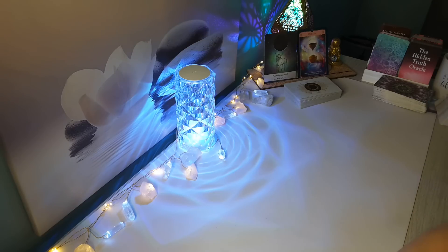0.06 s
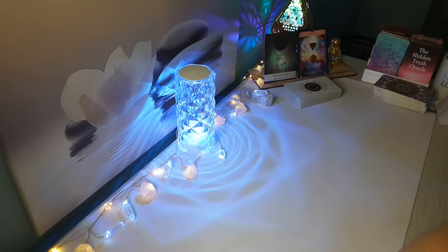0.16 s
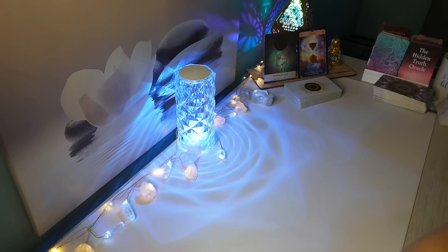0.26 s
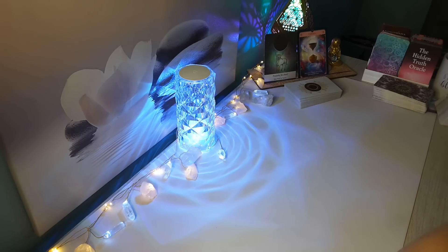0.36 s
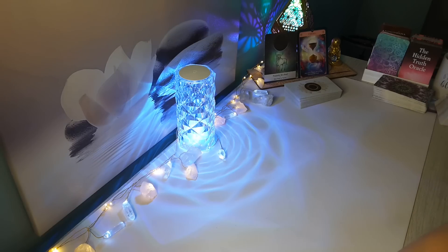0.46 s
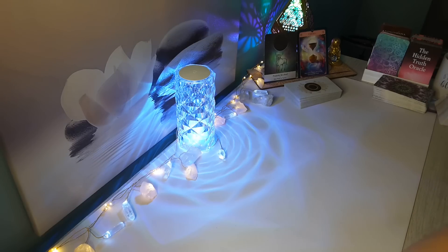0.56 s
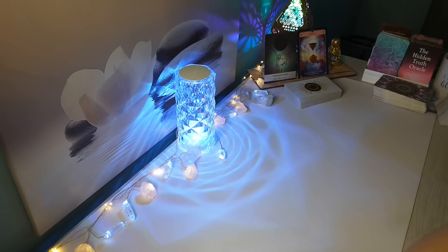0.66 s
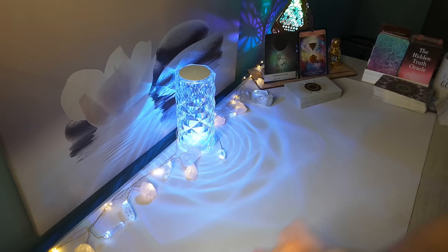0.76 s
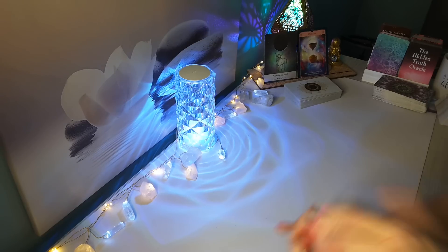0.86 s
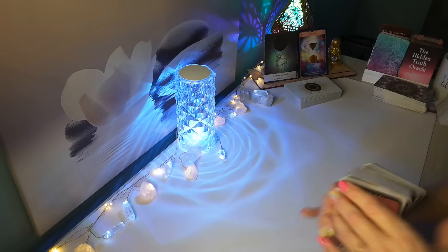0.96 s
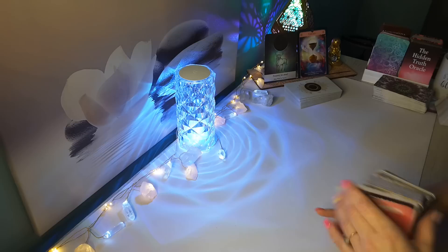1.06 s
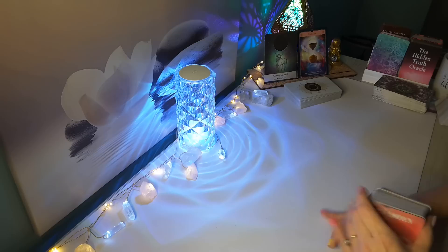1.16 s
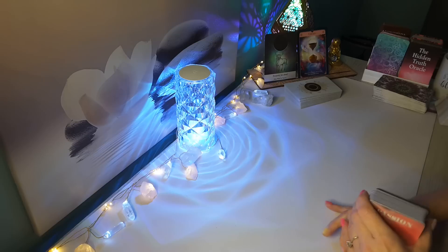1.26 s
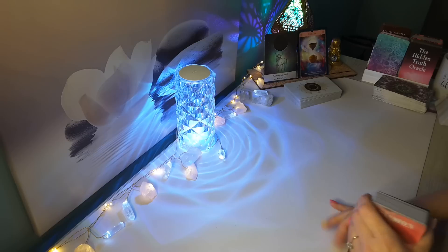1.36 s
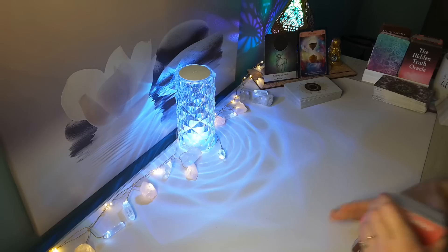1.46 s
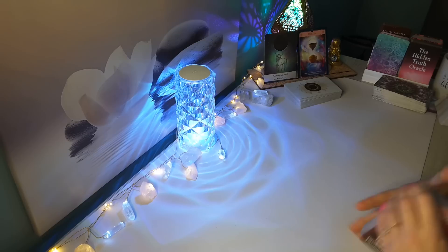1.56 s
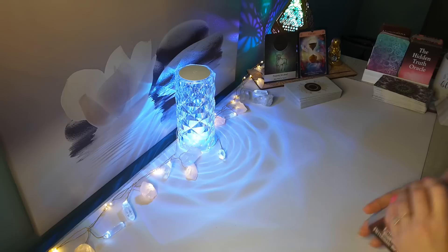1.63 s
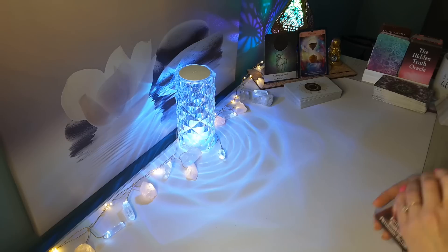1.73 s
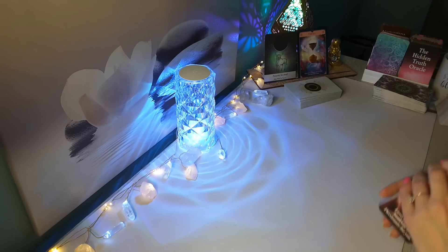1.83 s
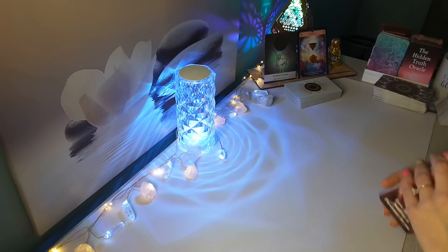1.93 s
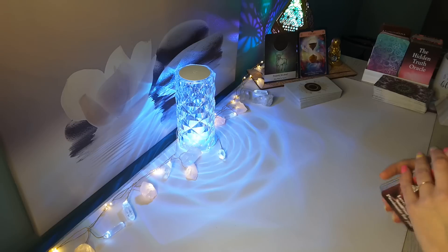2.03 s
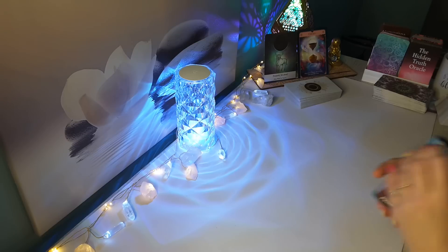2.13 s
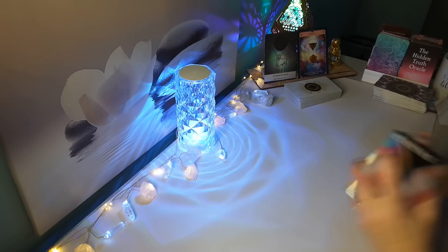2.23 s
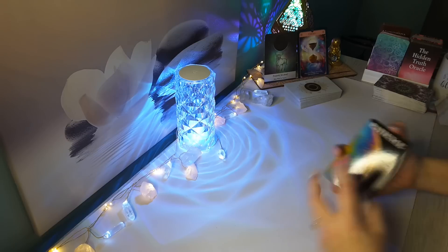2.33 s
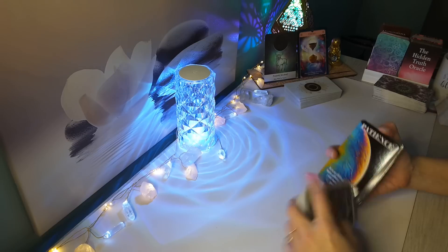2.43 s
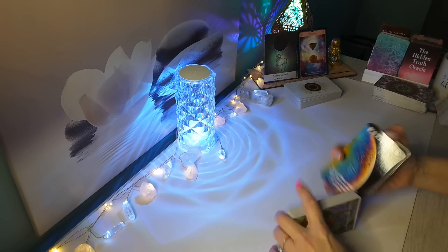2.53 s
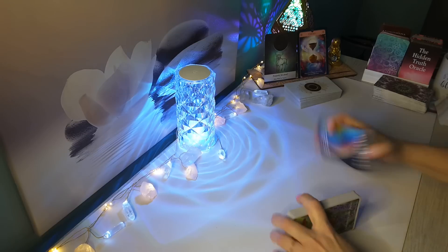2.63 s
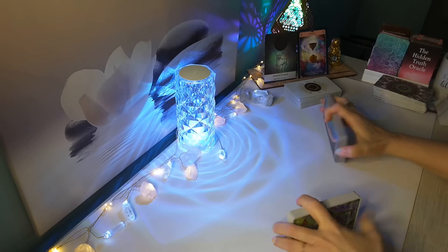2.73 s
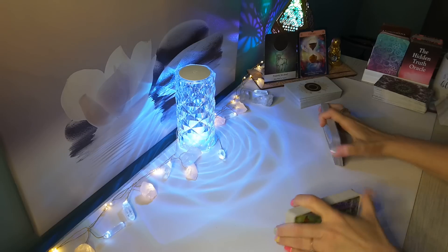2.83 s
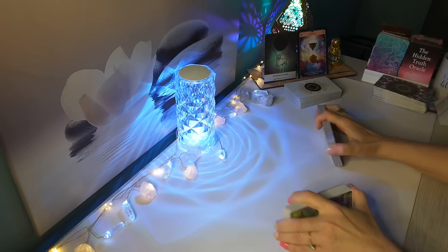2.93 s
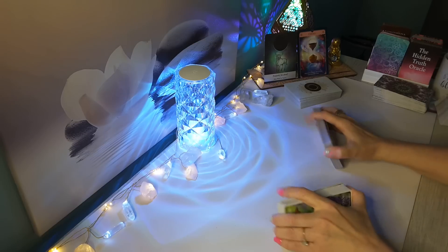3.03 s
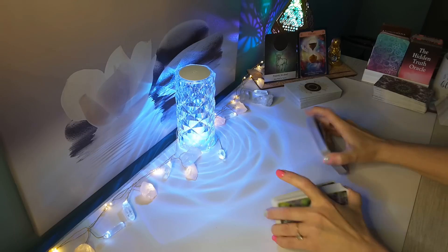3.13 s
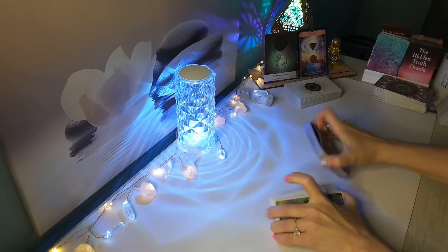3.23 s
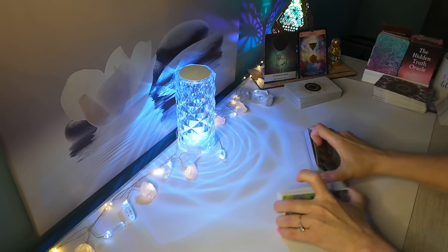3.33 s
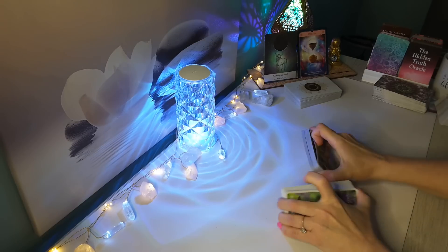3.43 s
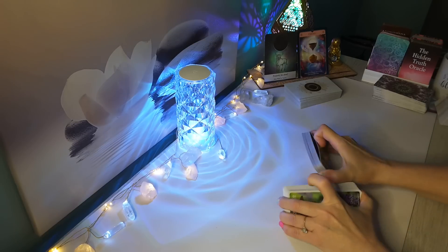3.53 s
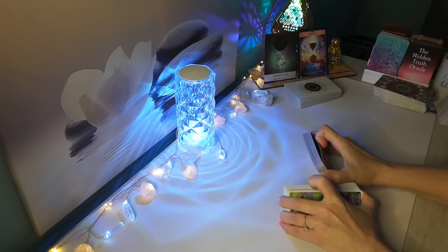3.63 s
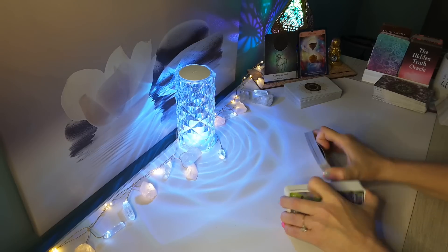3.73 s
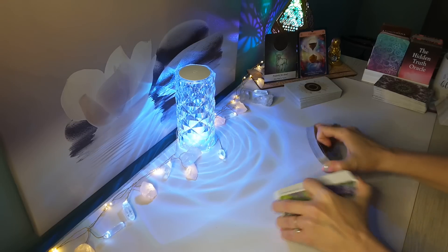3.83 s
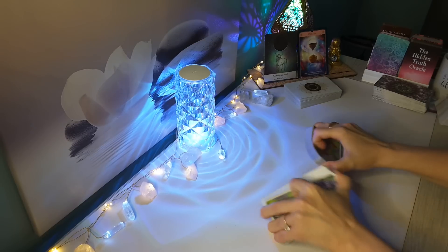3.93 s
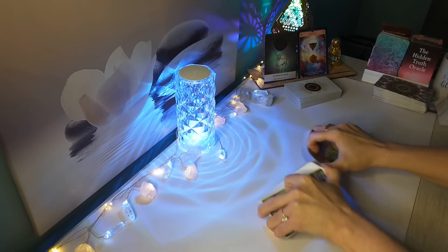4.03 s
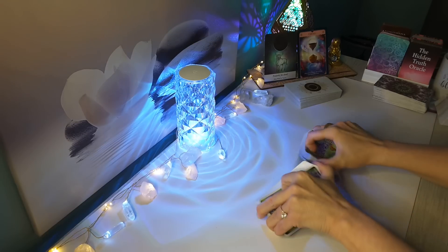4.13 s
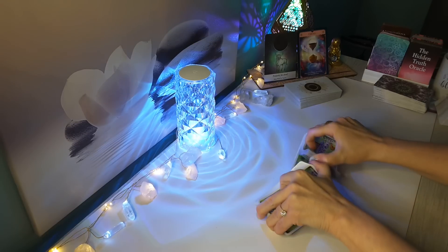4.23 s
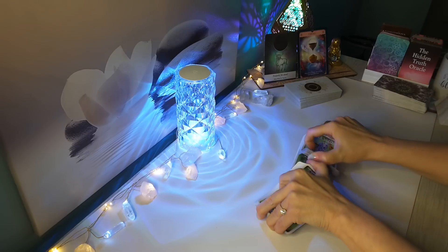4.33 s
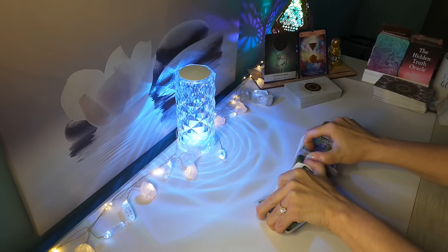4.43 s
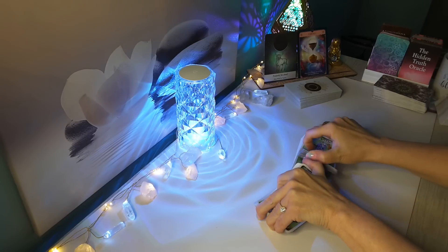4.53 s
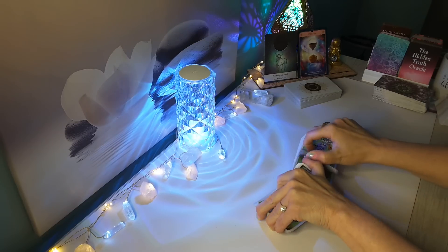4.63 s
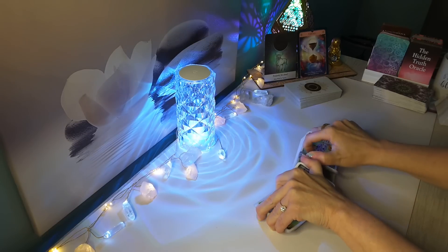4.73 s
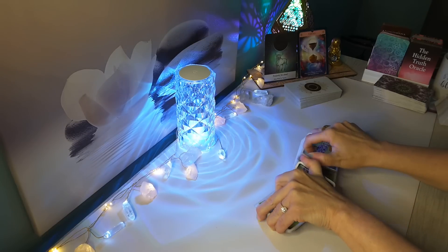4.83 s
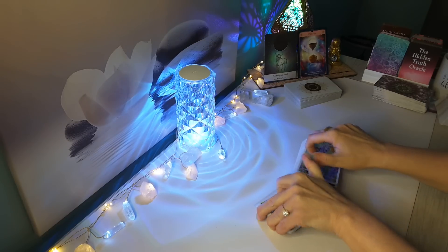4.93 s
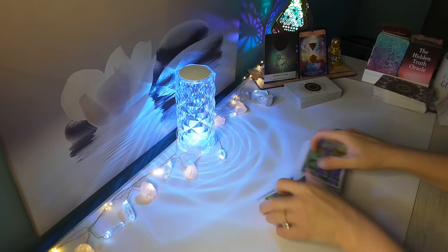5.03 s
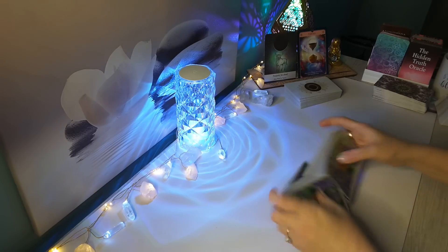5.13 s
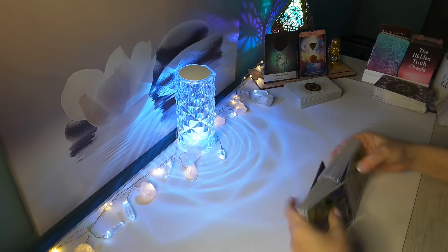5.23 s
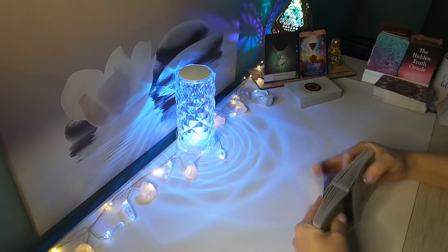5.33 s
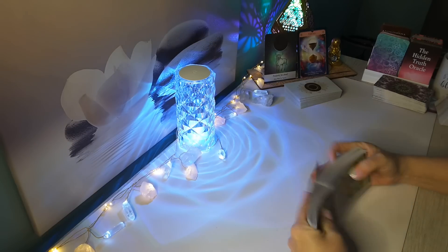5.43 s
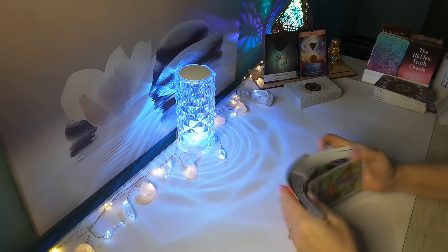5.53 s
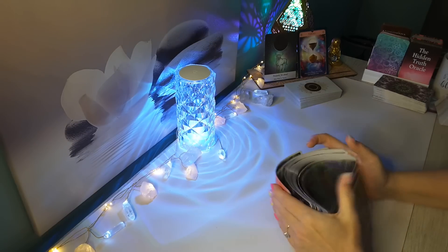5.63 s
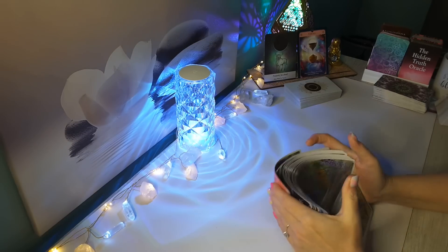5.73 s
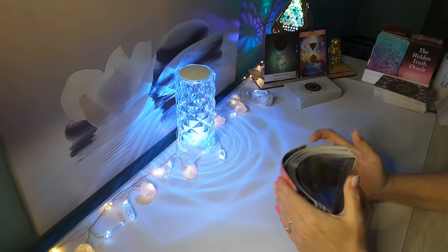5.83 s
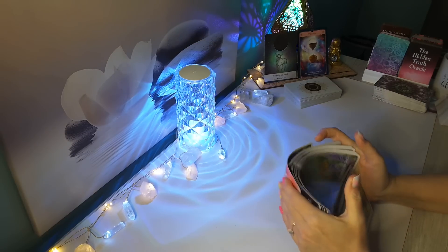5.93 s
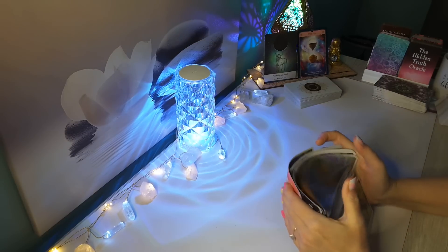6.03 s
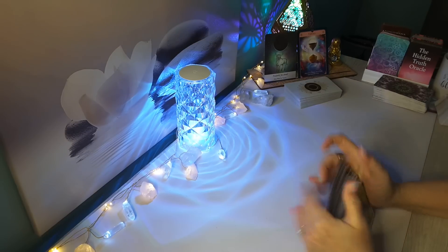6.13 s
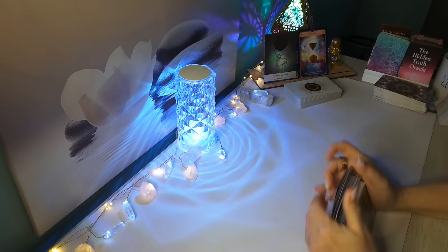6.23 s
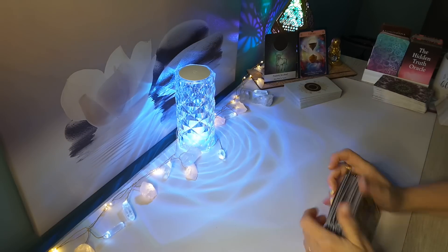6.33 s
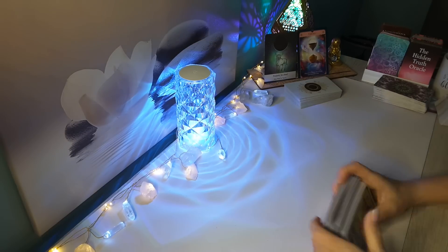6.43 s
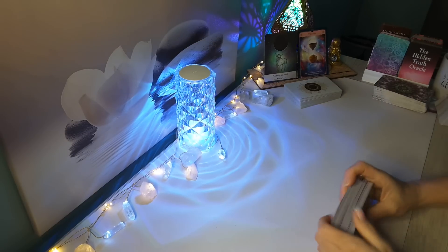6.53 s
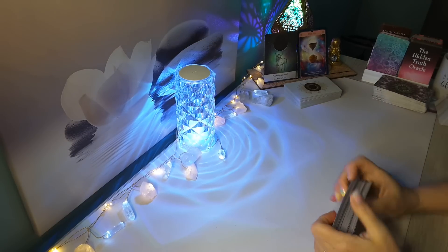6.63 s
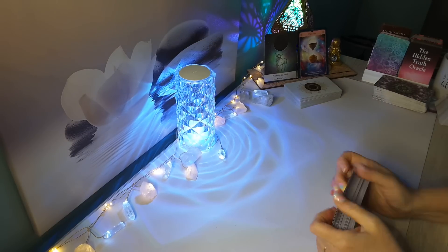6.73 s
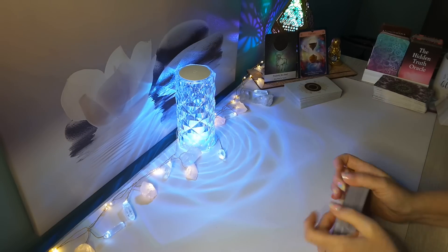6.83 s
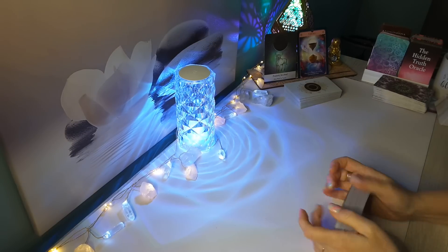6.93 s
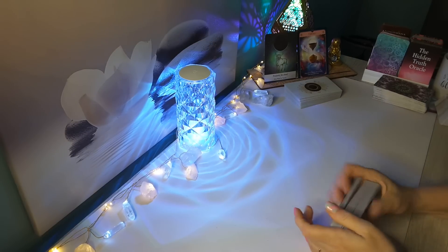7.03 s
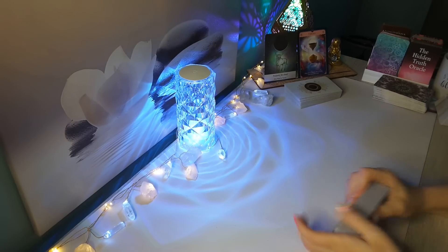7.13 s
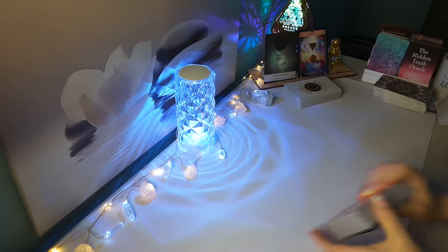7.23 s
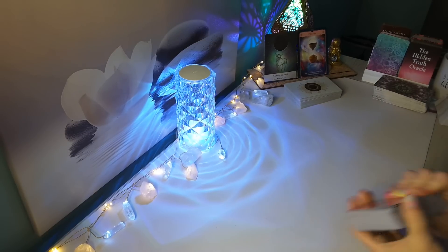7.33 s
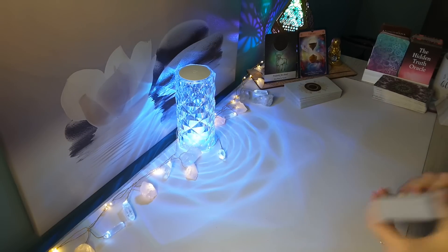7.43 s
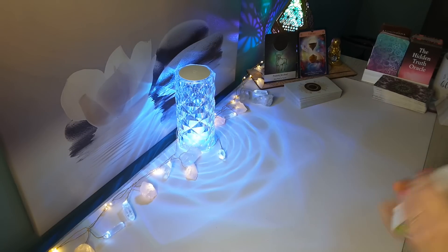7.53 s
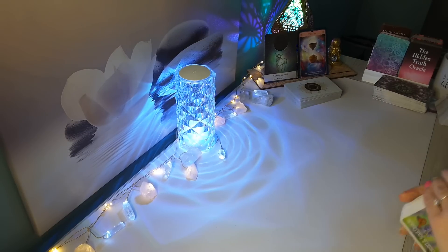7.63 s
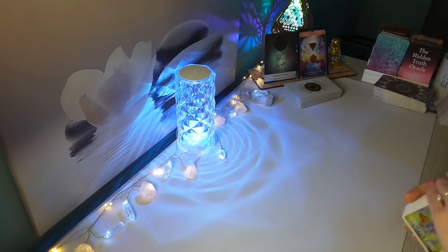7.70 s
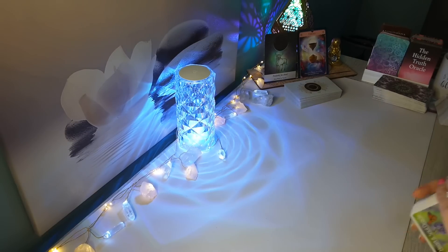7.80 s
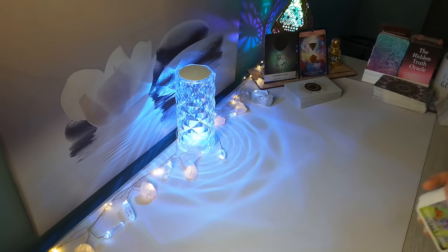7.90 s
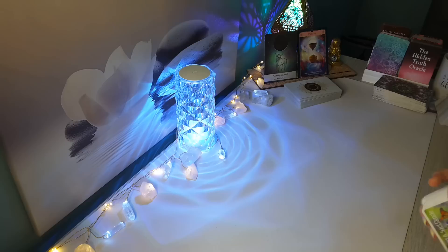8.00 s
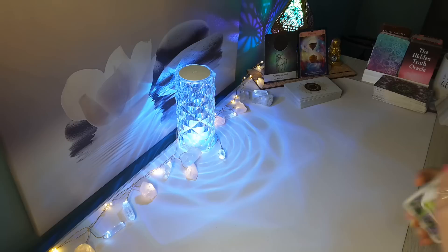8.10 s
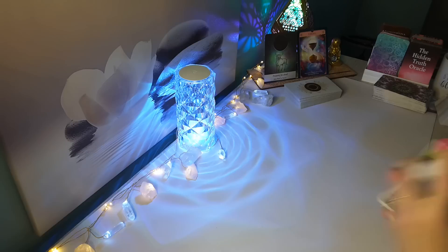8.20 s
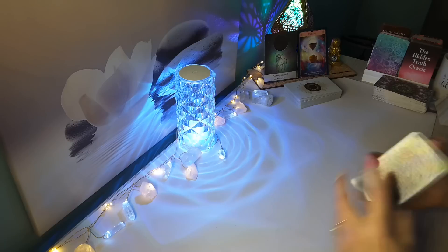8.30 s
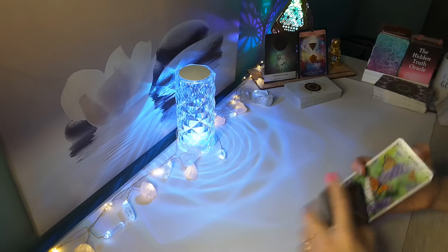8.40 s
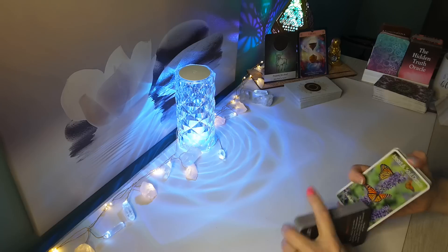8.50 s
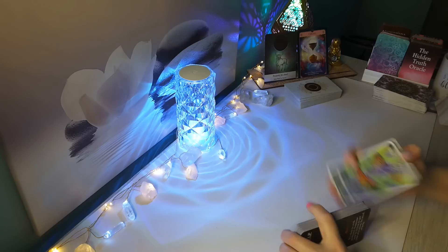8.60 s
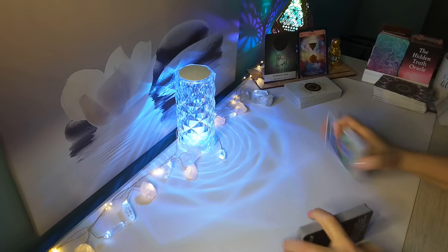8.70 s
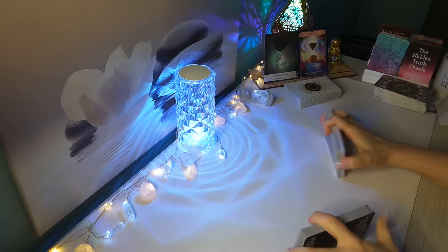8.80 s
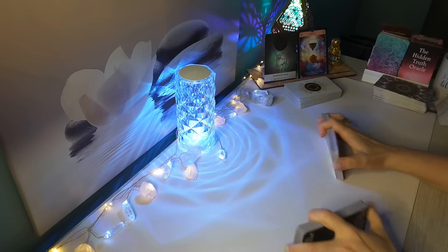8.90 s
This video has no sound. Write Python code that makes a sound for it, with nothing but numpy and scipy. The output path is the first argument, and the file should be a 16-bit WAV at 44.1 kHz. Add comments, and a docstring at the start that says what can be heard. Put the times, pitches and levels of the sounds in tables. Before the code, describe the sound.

Playing cards handled close up on a table in a small, lively room. Faint rubs and light knocks come first, with a couple of flicks, then a near pause. A sharp riffle crackles and rushes to its end, a bridge flutters down in a hiss with loud snaps, and taps square the deck. After near quiet, another soft cut. The stereo microphone is bright, its treble ringing slightly toward the left, over very faint hiss and rumble.

```python
"""A deck of cards on a table in a small room, nearby walls: filtered noise bursts, grains and resonances.
First the cards rub in the hands, packets are nudged and cut with knocks, and a few cards snap off the thumbs.
At 4.5 s the riffle rushes to its end; from 5.65 s the bridge cascades with a fluttering hiss.
After 6.3 s the deck is squared with a few taps, and near 8.5 s it is cut again.
The table rings and the room answers throughout, over faint hiss and rumble; the microphone rings near 8 kHz."""
import sys
import numpy as np
from scipy import signal
from scipy.fft import rfft, irfft, next_fast_len
from scipy.io import wavfile

SR = 44100
rng = np.random.default_rng(int(sys.argv[2]) if len(sys.argv) > 2 else 0)


def generate_wav(signal):
    """Clip the signal to [-1, 1] and save it as 16-bit WAV at the path in sys.argv[1]."""
    frames = np.transpose(np.atleast_2d(signal))
    scaled = np.clip(frames, -1, 1) * 32767
    pcm = np.round(scaled).astype(np.int16)
    wavfile.write(sys.argv[1], SR, pcm)


N = 395136  # samples

# Event levels below are relative; each function adds its layer's level.
# Packets nudged and squared on the table: start_s, end_s, edge_friction_db, table_patter_db
NUDGE_EVENTS = [(0.0, 0.064, -58, -56.5), (3.095, 3.177, -62, -60.5), (3.287, 3.584, -66, -66.5),
                (4.21, 4.43, -47.5, -49.5), (5.242, 5.403, -59, -58.5), (5.53, 5.718, -51.5, -55.5),
                (6.33, 6.85, -55.5, -55), (6.9, 7.22, -58.5, -64)]
# Strokes of card over card: middle_s, friction_db, half_length_s
SLIDE_STROKES = [(0.052, -53.5, 0.0073), (0.19, -67.5, 0.027), (0.486, -55, 0.011), (0.643, -57.5, 0.058),
                 (0.89, -50.5, 0.009), (1.2, -58, 0.059), (1.352, -52, 0.034), (1.482, -55.5, 0.019),
                 (2.138, -57.5, 0.015), (2.297, -57, 0.0076), (2.389, -52, 0.035), (3.146, -58.5, 0.015),
                 (4.256, -35, 0.018), (5.147, -57.5, 0.058), (5.391, -41.5, 0.033), (5.559, -42.5, 0.024),
                 (7.33, -60.5, 0.01), (7.403, -63, 0.012), (7.73, -63.5, 0.035), (8.094, -54, 0.025),
                 (8.243, -55, 0.029), (8.332, -47, 0.019)]
# Packets landing: start_s, clack_db, clack_pitch_hz, edge_tick_over_clack_db, landing_time_s
PACKET_LANDINGS = [(0.299, -56, 1100, -2.5, .027), (0.472, -60.5, 1180, 4, 0.0037),
                   (0.541, -62, 1310, -1, 0.003), (0.89, -59, 1520, -2, 0.0047),
                   (1.213, -47.5, 736, -26, 0.0053), (1.232, -43, 1050, -10, 0.0056),
                   (1.2422, -29, 890, -9, 0.0067), (2.557, -45.5, 347, -13.5, 0.009),
                   (2.631, -40, 1298, -10, 0.0098), (2.83, -41, 930, -2, 0.0073),
                   (2.864, -33, 1300, 11, .0065), (3.098, -60, 450, -20, 0.011),
                   (3.583, -65, 582, -1, 0.0086), (3.798, -62.5, 800, 6.5, 0.0016),
                   (3.891, -55.5, 980, -21, 0.0024), (4.205, -41.5, 1780, 9.5, 0.0039),
                   (4.237, -38, 1370, -6, 0.0064), (4.254, -40, 1240, 10, 0.0028),
                   (4.4801, -34, 910, 5.5, 0.0035), (4.994, -35.5, 1090, 0.5, 0.0076),
                   (5.411, -48, 1410, 1, 0.0046), (6.033, -27.5, 1400, 4.5, 0.0043),
                   (6.385, -36, 1540, -6, .01), (6.475, -36.5, 1550, -6.5, 0.0061),
                   (6.556, -37, 720, -9.5, .027), (6.592, -34.5, 1270, -21, 0.008),
                   (6.815, -38, 1220, -9, .015), (6.895, -30.5, 1770, -1, .003),
                   (8.436, -49.5, 1900, -7, .004), (8.546, -41.5, 890, -7.5, .016),
                   (8.618, -46, 1100, -12, 0.0085), (8.692, -59, 950, -12, .008),
                   (8.854, -47.5, 840, 0.5, 0.0038), (8.898, -39, 1360, -3, 0.0084)]
# Loudest single card edges snapping free: start_s, level_db
CARD_SNAPS = [(0.429, -49), (2.4472, -34.5), (2.4706, -27.5), (3.4, -47), (3.8908, -44), (4.3536, -20),
              (4.3841, -21.5), (4.5013, -16.5), (4.5219, -25.5), (4.5821, -23), (4.6219, -25.5),
              (4.6363, -21.5), (4.7115, -21.5), (4.7446, -26), (4.7649, -25), (4.7915, -25),
              (4.8276, -27.5), (4.861, -28), (4.8779, -23), (4.9343, -19.5), (5.2728, -42.5),
              (5.551, -27.5), (5.707, -26.5), (5.726, -29.5), (5.7565, -25), (5.8532, -29), (5.977, -18),
              (5.9934, -19.5), (6.0231, -24), (6.149, -17.5), (6.1631, -21.5), (6.2129, -19),
              (6.2241, -15.5), (7.1372, -40), (8.4223, -34.5), (8.4703, -30)]
# Flow of the cards cascading in the bridge: time_s, flow_db
BRIDGE_FLOW = [(5.65, -50.5), (5.728, -26.5), (5.926, -32.5), (6.03, -29), (6.11, -28.5), (6.23, -23),
               (6.235, -33)]
# Drift as the arch flattens, edges rubbing less and the table jogged more:
# friction_db_per_s, flapping_db_per_s, patter_db_per_s
ARCH_FLATTENING = (-7, -3.5, 11.5)

# Relative spectra of the contacts, each with columns: frequency_hz, power_density_db
# card edges scraping their neighbours
EDGE_SPECTRUM = [(60, -39), (1000, -7.5), (3000, -1.5), (6000, -5), (8500, 0), (11500, -6), (15500, -16.5)]
# card faces flapping against the pile
FLAP_SPECTRUM = [(120, -32.5), (450, -3.5), (900, -1), (1800, -2.5), (3500, -8.5), (9000, -23.5)]
# pushes on the table
THUD_SPECTRUM = [(35, -48.5), (70, -27.5), (120, -1), (200, -7), (330, 4), (620, -6), (1100, -20),
                 (3000, -60)]
# card sliding over card
RUB_SPECTRUM = [(100, -29.5), (1500, 0.5), (3000, 1.5), (7500, -2), (10500, 1), (15500, -8.5)]
# packet edges ticking as they land
TICK_SPECTRUM = [(100, -54.5), (1700, -3), (2900, 6), (4500, -1), (6200, -11.5), (8300, -9.5),
                 (14000, -27.5)]
# cards snapping
SNAP_SPECTRUM = [(50, -43), (250, -11.5), (1200, -3), (3200, 3), (6000, -2.5), (8500, -1), (11000, -5.5),
                 (15000, -13.5)]
# faint hiss and rumble under the scene
FLOOR_SPECTRUM = [(20, -14), (46, -0.5), (62, 17.5), (85, 3), (300, 4.5), (1000, -3.5), (4000, -10.5),
                  (15500, -14)]

# Ringing modes of the table top: mode_hz, ring_over_plain_contact_db
TABLE_MODES = [(160, 15.5), (231, 22.5), (307, 9), (366, 4), (436, 2), (529, 9), (815, 11.5), (852, 6.5),
               (1056, -11.5), (1193, -1), (1312, 1.5)]
# Spectrum of the echo from the walls: frequency_hz, gain_db
WALL_SPECTRUM = [(50, -21), (200, 6), (700, 4), (3000, 0), (8000, -4.5), (15000, -2.5)]
# Stereo balance of the microphone, left brighter in the treble: frequency_hz, left_minus_right_db
STEREO_BALANCE = [(330, 0), (600, -0.4), (1400, 0.3), (2400, 3), (4000, 3.3), (6000, 7), (7600, 13.5),
                  (9200, 10), (10500, 0.5), (15000, -0.5)]

# Exponential time constants of the hand movements
ATTACK_S, RELEASE_S = 0.013, 0.034
NUDGE_FLAP_DB = -10  # flapping relative to edge friction
# Before the layer levels, thud and clack are equally strong at THUD_EVEN_HZ; lower packets thud harder
THUD_EVEN_HZ, THUD_DB_PER_OCTAVE = 670, 10
RIFFLE_START_S, RIFFLE_END_S = 4.49, 5.0
# Edge friction, flapping and patter as the riffle starts, before the layer levels
RIFFLE_DB, RIFFLE_FLAP_DB, RIFFLE_PATTER_DB = -44, -59.5, -40
# Final rush as the packets run out, and cushioning of the table by the growing pile
RUSH_DB, RUSH_S, CUSHION_DB_PER_S = 13, 0.15, 19.5
# Edge friction, flapping and patter relative to the flow as the bridge starts
BRIDGE_DB, BRIDGE_FLAP_DB, BRIDGE_PATTER_DB = -3, -4.5, -18
BRIDGE_FALL_S = 5.745  # the bent cards only rub at first; from here they also fall
TABLE_T60_S, ROOM_T60_S = 0.29, 0.36
CUTOFF_HZ = 15900


def from_db(db):
    """Decibels to amplitude."""
    return 10 ** (np.asarray(db) / 20)


def rms_one(x):
    """Scales a signal to rms 1."""
    return x / np.sqrt(np.mean(x ** 2) + 1e-20)


def at_hz(points, hz):
    """Reads a spectrum along a log-frequency axis."""
    f, value = np.transpose(points)
    return np.interp(np.log(hz + 1e-9), np.log(f), value)


def colour(x, spectrum, size=4096):
    """Causal (minimum-phase) filter of the given shape that keeps the power of white noise."""
    spectrum_db = at_hz(spectrum, np.fft.rfftfreq(size, 1 / SR))
    cepstrum = irfft(np.log(from_db(spectrum_db)))
    causal_cepstrum = 2 * cepstrum * (np.arange(size) < size // 2)
    response = irfft(np.exp(rfft(causal_cepstrum)))
    return signal.oaconvolve(x, response / np.linalg.norm(response))[:N]


def resonate(x, hz, width_hz):
    """Two-pole resonance with gain 1 on top."""
    r = np.exp(-np.pi * width_hz / SR)
    feed = np.array([1, 0, -1]) * (1 - r * r) / 2
    feedback = [1, -2 * r * np.cos(2 * np.pi * hz / SR), r * r]
    return signal.lfilter(feed, feedback, x + 1e-18)


def grains(per_s, spread_db):
    """Random clicks of uneven size and either sign; rms 1."""
    sizes = from_db(spread_db * np.minimum(rng.exponential(1, N), 3))
    happens = rng.random(N) < per_s / SR
    return rms_one(happens * sizes * rng.choice([-1, 1], N))


def burst(length_s, rise=0.23, size=4096):
    """One contact is a crowd of tiny impacts that swells and quickly dies."""
    age = np.arange(size) / max(length_s * SR, 1)  # in decay times
    return rng.standard_normal(size) * np.exp(-age) * (1 - np.exp(-age / rise))


def place(times, levels_db, sounds):
    """Puts each sound at its time, with the energy that its level gives."""
    out = np.zeros(N + SR)
    for s, db, sound in zip(times, levels_db, sounds):
        at = max(round(s * SR), 0)
        out[at:at + len(sound)] += from_db(db) * sound / np.linalg.norm(sound)
    return out[:N]


def held(start_s, end_s):
    """Gain of one hand movement: exponential rise up to its start, hold, exponential fall after its end."""
    t = np.arange(N) / SR
    rise, fall = (t - start_s) / ATTACK_S, (end_s - t) / RELEASE_S
    return np.exp(np.clip(np.minimum(rise, fall), -20, 0))


def nudging():
    """Gains of friction, flapping and patter while the packets are pushed into line."""
    return sum(from_db([[db], [db + NUDGE_FLAP_DB], [patter_db]]) * held(start, end)
               for start, end, db, patter_db in NUDGE_EVENTS)


def shuffling(edge_db=-6.0, flap_db=0.0, patter_db=-8.0, cards_per_s=300, scrape_s=0.0013, smooth=0.7):
    """Each falling card scrapes its neighbour's edge, flaps flat against the pile and jogs the table."""
    friction, flapping, patter = nudging() + riffle() + bridge()
    falls = grains(cards_per_s, spread_db=2.5)
    # every fall opens a short, decaying contact
    decay = np.exp(-1 / (scrape_s * SR))
    contact = rms_one(signal.lfilter([1], [1, -decay], np.abs(falls) + 1e-18))
    scrape, flap = rms_one((contact + smooth) * rng.standard_normal((2, N)))
    edges = from_db(edge_db) * colour(friction * scrape, EDGE_SPECTRUM)
    faces = from_db(flap_db) * colour(flapping * flap, FLAP_SPECTRUM)
    # each fall is also one small push on the table
    jogs = from_db(patter_db) * colour(patter * falls, THUD_SPECTRUM)
    return edges + faces + jogs


def dragging(level_db=-7, pitch_hz=520, width_hz=420):
    """A nudged packet drags on the table top with a soft, hollow rub: noise through two resonances."""
    patter = nudging()[2]
    narrow_rub = resonate(rng.standard_normal(N), pitch_hz, width_hz)
    rub = resonate(narrow_rub, pitch_hz, 2 * width_hz)
    return from_db(level_db) * patter * rms_one(rub)


def sliding(level_db=-4.5, holding_db=-75, catches_per_s=500, smooth=1.0):
    """Card rubs on card: a soft hiss with tiny catches of the edges, never quite still while the deck is held."""
    t = np.arange(N) / SR
    strokes = sum(from_db(db) * np.exp(-.5 * ((t - s) / half) ** 2) for s, db, half in SLIDE_STROKES)
    catches = grains(catches_per_s, spread_db=3.5)
    rub = rms_one(catches + smooth * rng.standard_normal(N))
    return from_db(level_db) * colour((strokes + from_db(holding_db)) * rub, RUB_SPECTRUM)


def knocks(thud_db=24.0, clack_db=28.0, tick_db=26.5, band_ratio=1.56):
    """A packet pushes the table once, while its cards land one after another and clack at the packet's pitch."""
    s, clack, pitch, edge, landing = np.transpose(PACKET_LANDINGS)
    thud = clack - THUD_DB_PER_OCTAVE * np.log2(pitch / THUD_EVEN_HZ)
    tick = clack + edge
    push = place(s + landing / 2, thud + thud_db, np.ones((len(s), 1)))
    # band edges around the pitch of each packet
    ratio = max(band_ratio, 1.1)
    band = np.array([1 / ratio, ratio])
    clacks = []
    for hz, length in zip(pitch, landing):
        clack_band = signal.butter(1, hz * band, "band", fs=SR, output="sos")
        clacks.append(signal.sosfilt(clack_band, burst(length)))
    edges = place(s, tick + tick_db, [burst(length) for length in landing])
    face_band = signal.butter(2, [200, 3200], "band", fs=SR, output="sos")
    faces = signal.sosfilt(face_band, place(s, clack + clack_db, clacks))
    return colour(push, THUD_SPECTRUM) + faces + colour(edges, TICK_SPECTRUM)


def snaps(level_db=17.0, length_s=0.0015):
    """A bent card slips off the thumb and hits its neighbour within a millisecond or two."""
    s, db = np.transpose(CARD_SNAPS)
    return colour(place(s, db + level_db, [burst(length_s) for _ in s]), SNAP_SPECTRUM)


def riffle():
    """Gains of friction, flapping and patter as two packets interleave, steadily and then in a rush."""
    t = np.clip(np.arange(N) / SR, RIFFLE_START_S, RIFFLE_END_S)
    rush = RUSH_DB * np.exp(-((RIFFLE_END_S - t) / RUSH_S) ** 2)
    cushion = CUSHION_DB_PER_S * (t - RIFFLE_START_S)
    gains_db = [RIFFLE_DB + rush, RIFFLE_FLAP_DB + rush, RIFFLE_PATTER_DB - cushion]
    return from_db(gains_db) * held(RIFFLE_START_S, RIFFLE_END_S)


def flicks(level_db=-10, per_s=35, length_s=0.00043):
    """Lesser snaps come at random among the falling cards and grow with their friction."""
    friction = (riffle() + bridge())[0]
    slips = rms_one(signal.oaconvolve(grains(per_s, spread_db=0.5), burst(length_s))[:N])
    return from_db(level_db) * colour(friction * slips, SNAP_SPECTRUM)


def bridge():
    """Gains of friction, flapping and patter while the arched deck cascades; all follow one flow."""
    s, flow_db = np.transpose(BRIDGE_FLOW)
    t = np.clip(np.arange(N) / SR, s[0], s[-1])
    start_db = np.array([[BRIDGE_DB], [BRIDGE_FLAP_DB], [BRIDGE_PATTER_DB]])
    shares_db = start_db + np.outer(ARCH_FLATTENING, t - s[0])
    rubbing, falling = held(s[0], s[-1]), held(BRIDGE_FALL_S, s[-1])
    return from_db(np.interp(t, s, flow_db) + shares_db) * np.array([rubbing, falling, falling])


def table_top(x):
    """Every contact sets the table's modes ringing, all with one decay time."""
    width_hz = np.log(1000) / (np.pi * TABLE_T60_S)
    return x + sum(from_db(db) * resonate(x, hz, width_hz) for hz, db in TABLE_MODES)


def room(x, wet_db, build_s=0.00065, size=32768):
    """Reflections from the nearby walls build up fast and die away diffusely."""
    age = np.arange(size) / SR
    tail = rng.standard_normal(size) * from_db(-60 * age / ROOM_T60_S)
    tail = tail * (1 - np.exp(-age / build_s))
    wall_gain = from_db(at_hz(WALL_SPECTRUM, np.fft.rfftfreq(size, 1 / SR)))
    tail = irfft(rfft(tail / np.linalg.norm(tail)) * wall_gain)
    return from_db(wet_db) * signal.oaconvolve(x, tail[:size // 2])[:N]


def scene(floor_db=-69.5):
    """Each kind of contact reaches the walls by its own paths; a faint hiss and rumble lie under it all."""
    rubbing = shuffling() + dragging() + sliding()
    knocking = knocks()
    snapping = snaps() + flicks()
    echo = room(knocking, wet_db=0.5) + room(snapping, wet_db=1.5) + room(rubbing, wet_db=-4.0)
    floor = from_db(floor_db) * colour(rng.standard_normal(N), FLOOR_SPECTRUM)
    sound = table_top(knocking + snapping + rubbing) + echo + floor
    return np.array([sound, sound])


def record(dry, ring_hz=8200, ring_width_hz=950, ring_db=11.0):
    """The microphone rings in the treble, more on the left; the top is cut."""
    sound = dry + from_db(ring_db) * resonate(dry, ring_hz, ring_width_hz)
    size = next_fast_len(N + SR)
    # left over right; the two gains always sum to 2
    ratio = from_db(at_hz(STEREO_BALANCE, np.fft.rfftfreq(size, 1 / SR)))
    gains = np.array([2 * ratio / (1 + ratio), 2 / (1 + ratio)])
    sound = irfft(rfft(sound, size) * gains, size)[:, :N]
    low_pass = signal.ellip(10, .1, 70, CUTOFF_HZ, fs=SR, output="sos")
    return signal.sosfilt(low_pass, sound)


dry = scene()
out = record(dry)
generate_wav(out)
```